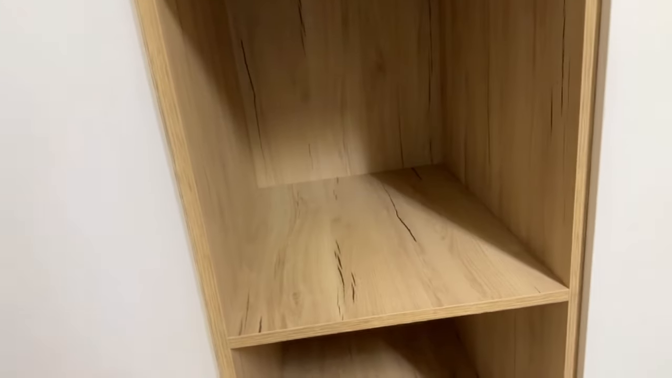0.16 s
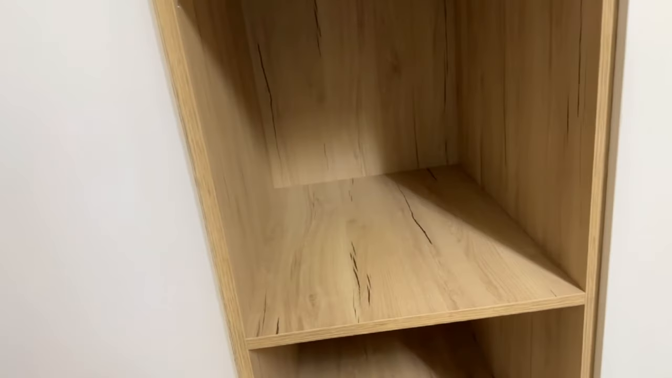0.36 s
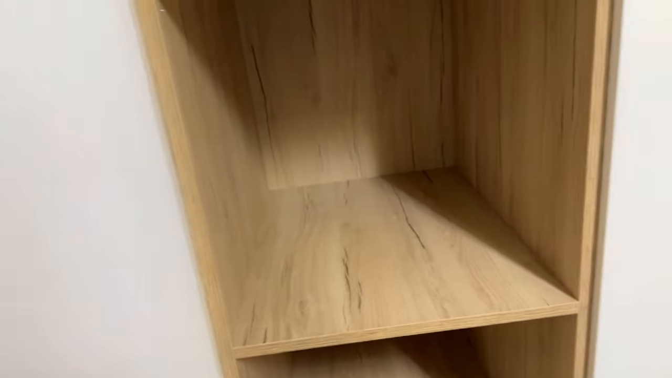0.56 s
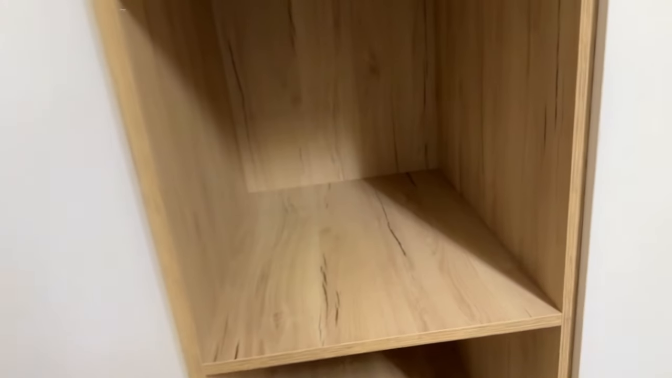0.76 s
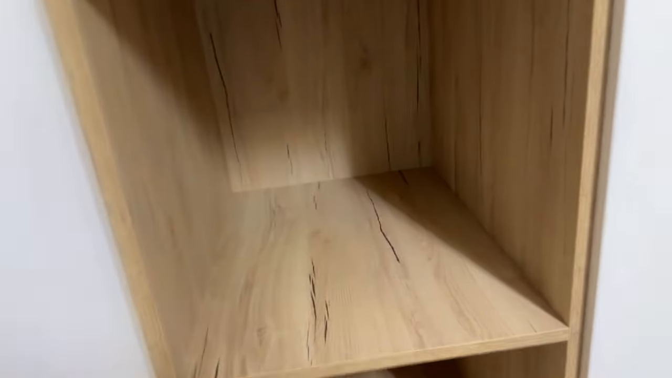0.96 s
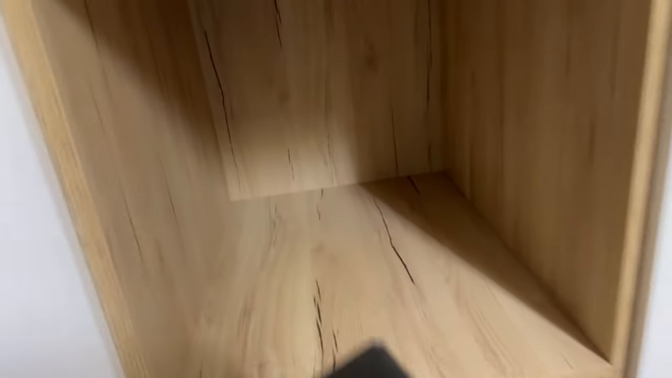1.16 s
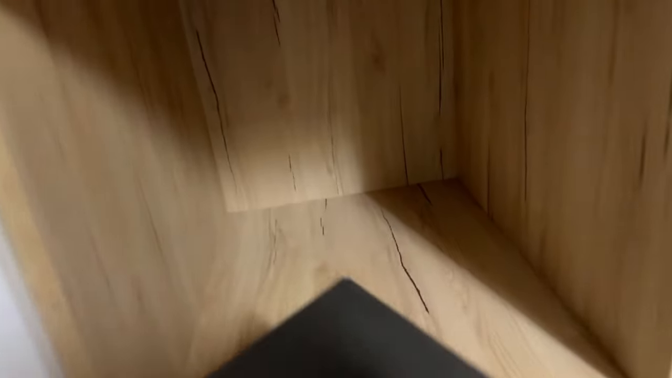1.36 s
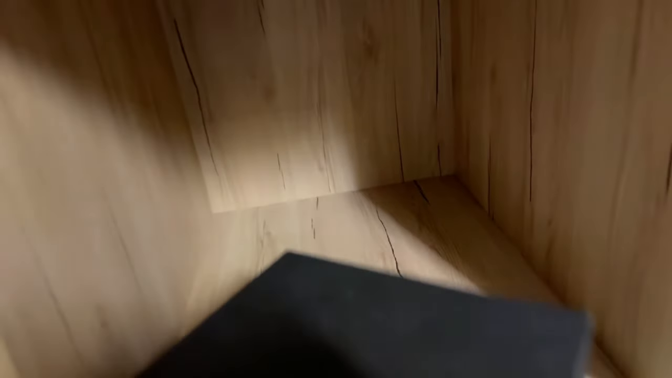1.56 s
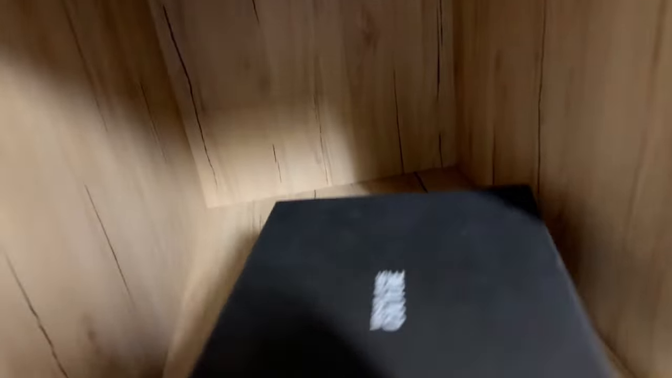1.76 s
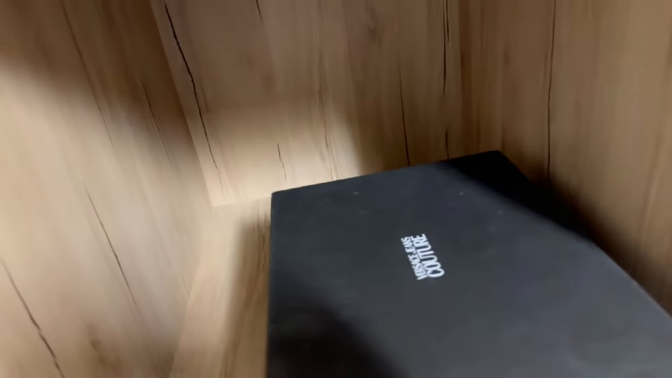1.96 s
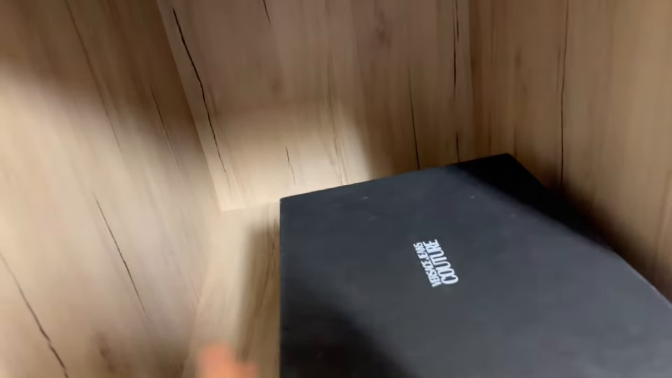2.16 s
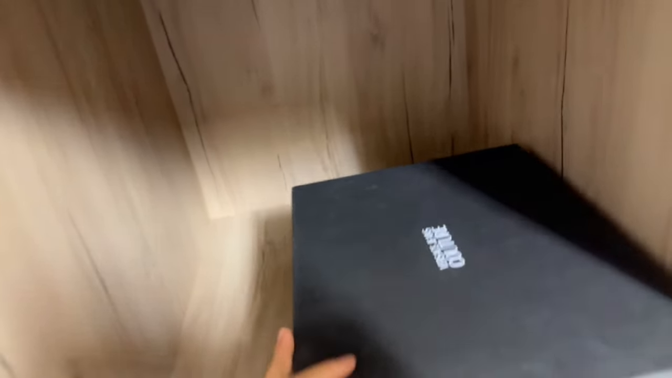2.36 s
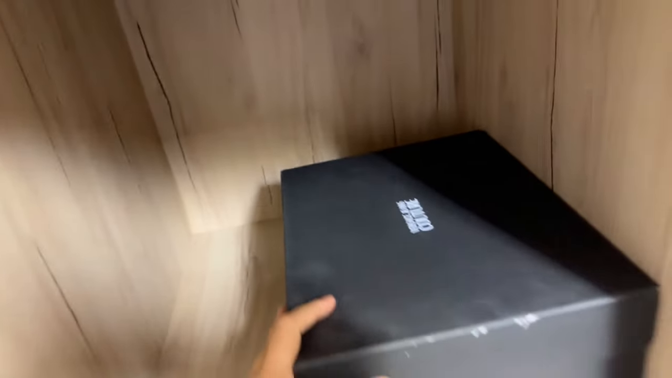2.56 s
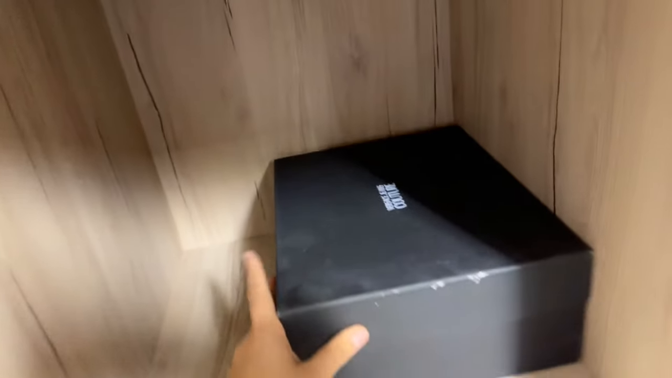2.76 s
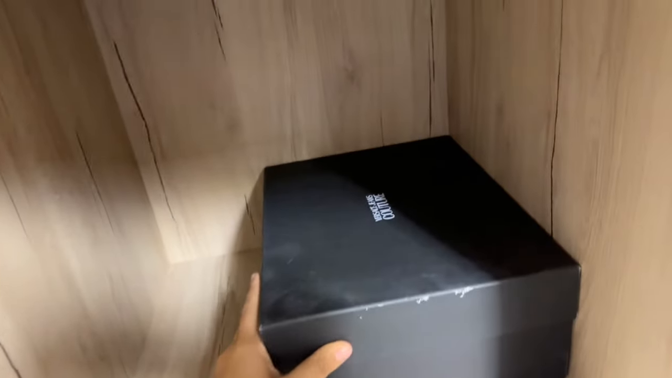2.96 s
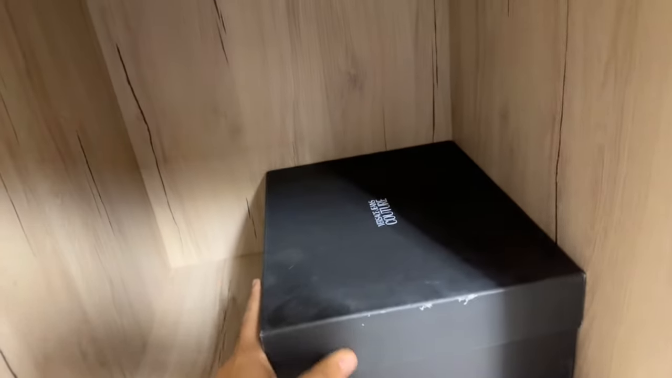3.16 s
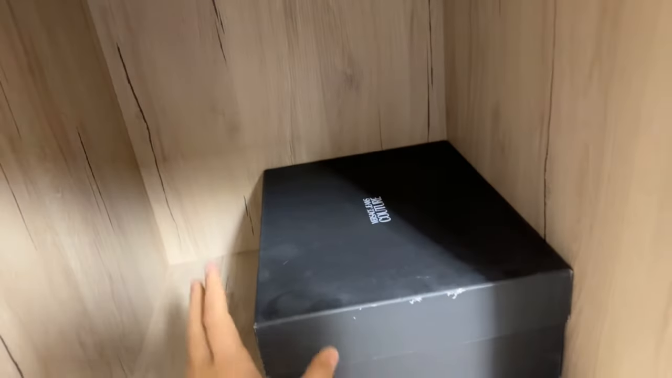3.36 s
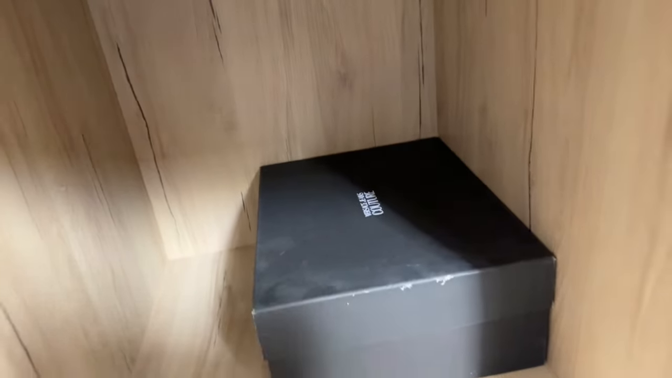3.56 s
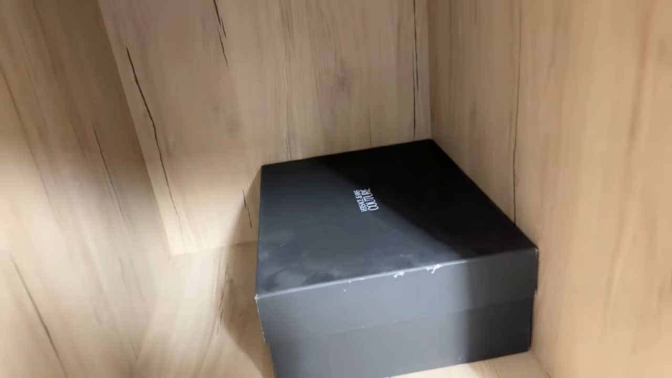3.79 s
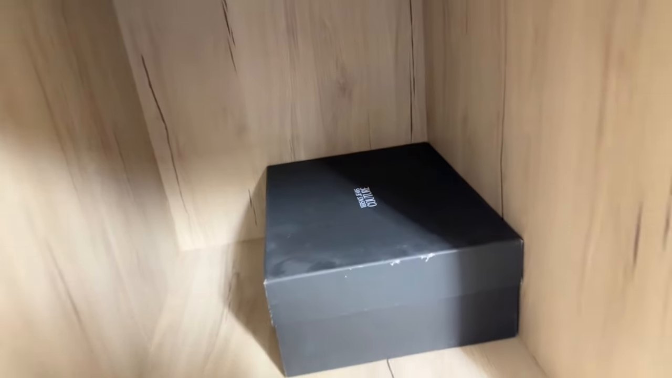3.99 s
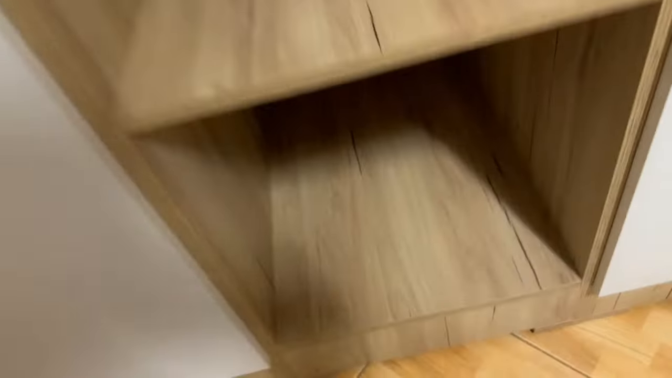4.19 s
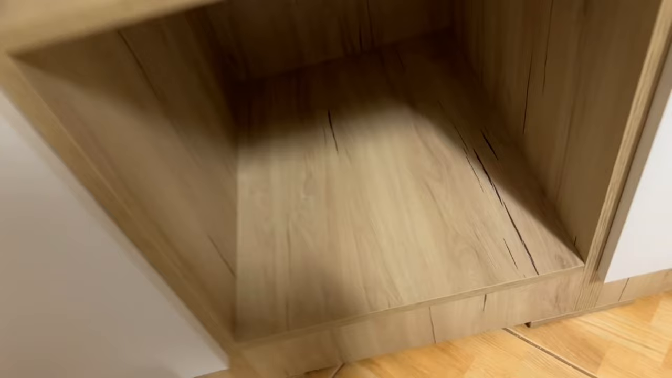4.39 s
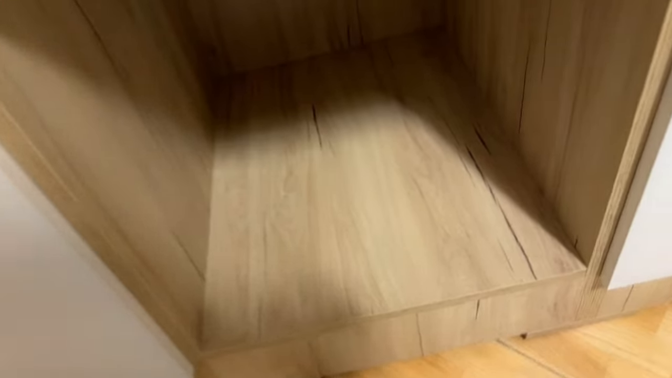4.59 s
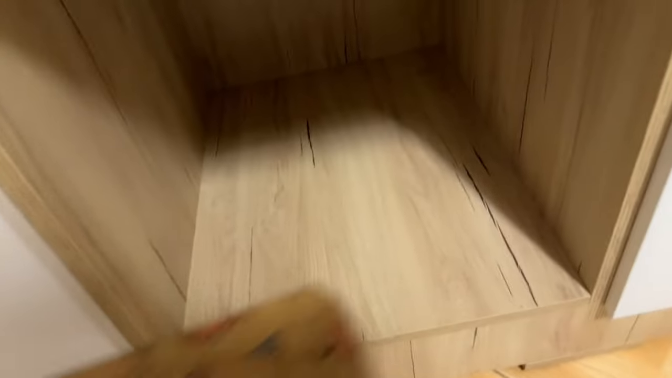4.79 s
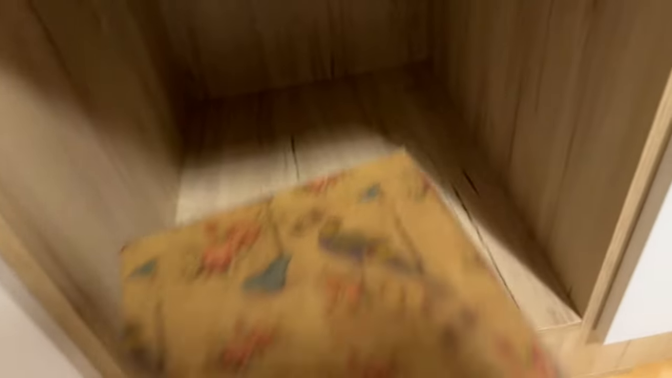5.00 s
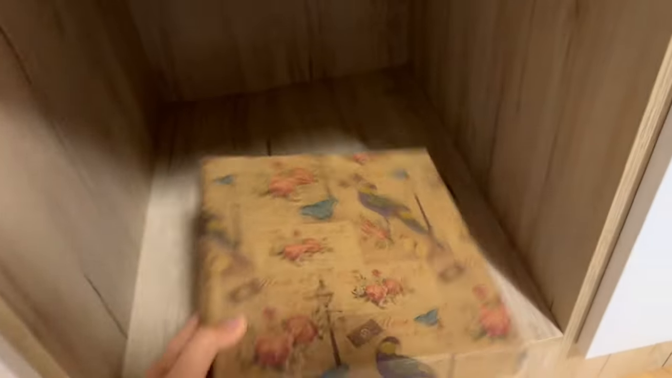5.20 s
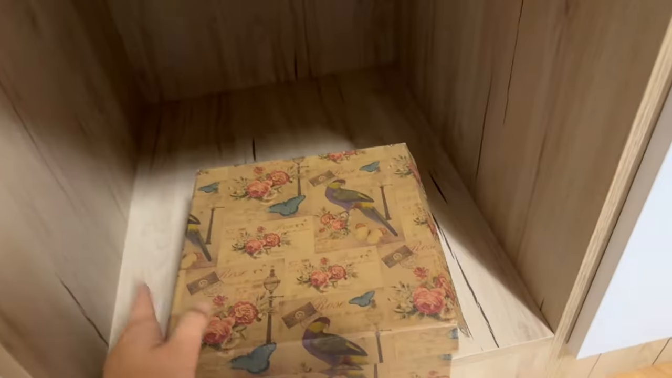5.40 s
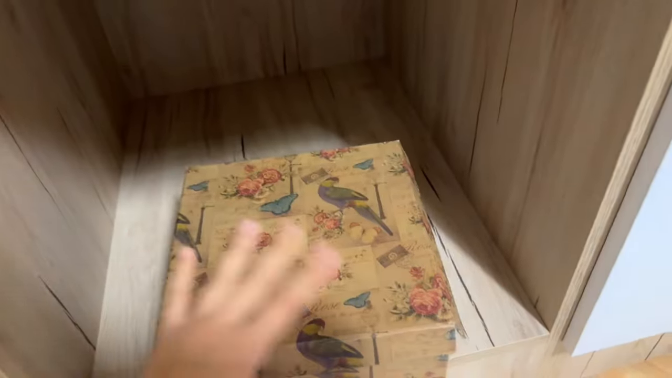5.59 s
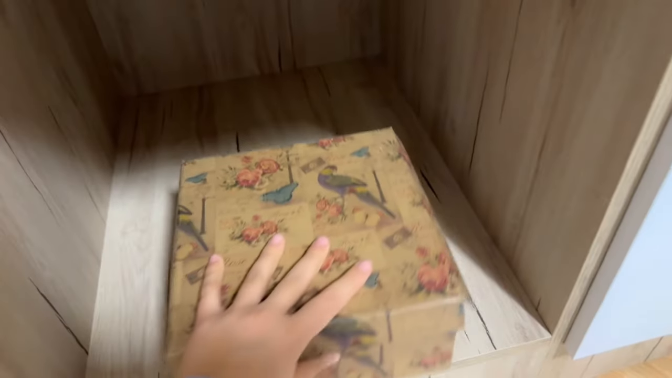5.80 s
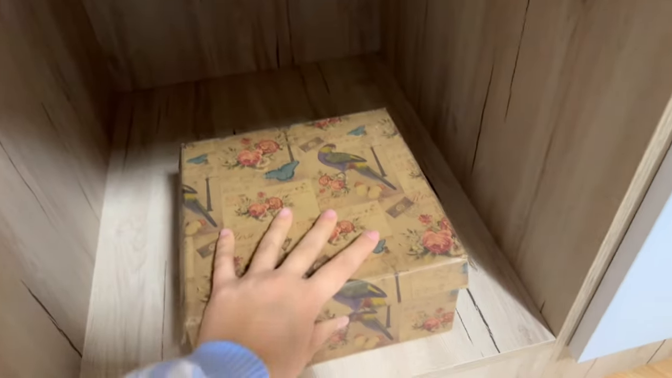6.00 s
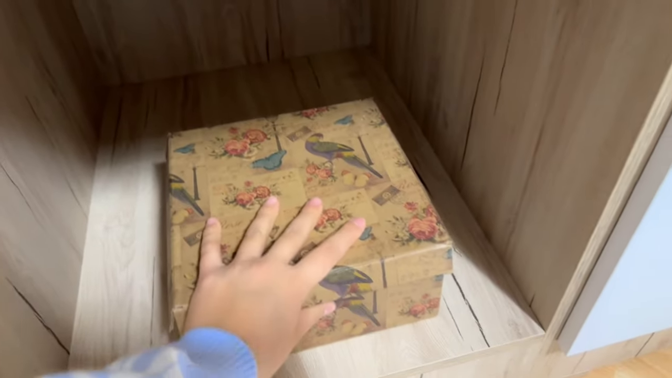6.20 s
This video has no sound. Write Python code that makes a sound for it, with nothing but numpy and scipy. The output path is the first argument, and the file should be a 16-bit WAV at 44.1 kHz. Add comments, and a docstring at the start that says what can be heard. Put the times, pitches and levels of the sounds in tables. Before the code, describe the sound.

A cardboard box thumps onto a wooden shelf and slides in, then a second lands and a hand faintly strokes its lid.

```python
"""Small dry ticks and handling rustle close to the microphone, over a low room rumble; then two cardboard
boxes, one after the other, bump into the cubbies of a chipboard shelf. Each bump rings the boards, the
deep boom swelling late. The first box squeaks, hisses and rubs as it is pushed in; a hand strokes the
lid of the second. Between the two, a finger taps and the sound drops out briefly."""
import sys
import numpy as np
from scipy import signal
from scipy.fft import rfft, irfft, next_fast_len
from scipy.io import wavfile
from scipy.ndimage import uniform_filter1d, minimum_filter1d

SR = 44100
rng = np.random.default_rng(int(sys.argv[2]) if len(sys.argv) > 2 else 0)


def dump_mix(stems):
    """Bounce the given channels to the path in sys.argv[1] as a 16-bit WAV at rate SR."""
    frames = np.atleast_2d(stems).T  # one column per channel
    limited = np.clip(frames, -1, 1)  # hard clip at full scale
    pcm = np.round(limited * 32767).astype(np.int16)
    wavfile.write(sys.argv[1], SR, pcm)


N = 275444
T = np.arange(N) / SR
BOOM_BELOW_HZ = 200

# Board and box modes, upper cubby. Each row: frequency in Hz, level in dB, T60 in seconds.
UPPER_CUBBY_MODES = [(104.6, 7.5, 0.41), (112.2, -7, 0.33), (156.7, -6, 0.37), (192, -13, 0.23),
                     (232, 0, 0.076), (295.2, 2.5, 0.068), (338.6, 1, 0.015), (420.5, 1, 0.03),
                     (522.4, -7.5, 0.12), (707, -8, 0.064), (790, -12.5, 0.044), (862, -11.5, 0.11),
                     (1035, -13, 0.044), (1256, -21, 0.03), (1815, -34, .04), (3145, -27, 0.044),
                     (3440, -28.5, .03)]
# Audible spans, one per box. Each row: start, fade-in, end, all in seconds.
AUDIBLE_SPANS = [(0.077, 0.0054, 4.1721), (4.33, 0.0091, 6.3)]


def undb(db):
    return 10 ** (np.asarray(db) / 20)


def unit(x):
    return x / np.sqrt(np.mean(x ** 2))


def peak(x):
    return x / np.abs(x).max()


def lowpass(x, hz):
    return signal.sosfilt(signal.butter(2, min(hz, .45 * SR), fs=SR, output="sos"), x)


def noise(spectrum, source=None):
    """White noise, or source, coloured by (Hz, dB) points; rms 1."""
    size = next_fast_len(N)
    hz, db = np.transpose(spectrum)
    bin_hz = np.maximum(np.arange(size // 2 + 1) * SR / size, 1)
    gain = undb(np.interp(np.log(bin_hz), np.log(hz), db, -120, -120))
    source = rng.standard_normal(N) if source is None else source
    return unit(irfft(rfft(source, size) * gain, size)[:N])


def mode(x, hz, t60_s):
    """Decaying resonance; a unit impulse rings at amplitude 1."""
    pole = np.exp(2j * np.pi * hz / SR - np.log(1000) / (max(t60_s, .003) * SR))
    return signal.lfilter([1], [1, -pole], x).imag


def band(x, hz, half_width_hz):
    """Lows of x shifted to a gliding centre; rms 1."""
    return unit(lowpass(x, half_width_hz) * np.sin(2 * np.pi * np.cumsum(hz) / SR))


def walk(rate_hz):
    """Slewed random steps, spread near 1."""
    hold = int(SR / rate_hz)
    return uniform_filter1d(np.repeat(rng.standard_normal(N // hold + 1), hold), hold)[:N]


def add(out, x, start_s):
    i = int(start_s * SR)
    out[i:i + len(x)] += x[:N - i]


def curve(tables, column):
    """Summed gain from a dB column of timed tables, silent outside them."""
    return sum(undb(np.interp(T, rows[:, 0], rows[:, column], -200, -200))
               for rows in map(np.array, tables))


def room_tone():
    """Drifting rumble, faint air, a wavering hum and microphone hiss."""
    # One table per span. Each row: time in seconds, rumble in dB, air in dB.
    levels = [
        [(.07, -49, -65), (.9, -45.5, -63.5), (1.7, -50.5, -64), (2.4, -53.5, -64), (4.22, -47.5, -64.5)],
        [(4.32, -41, -75), (5.0, -41.5, -70), (5.6, -41, -68.5), (6.4, -42, -65.5)],
    ]
    # Spectra, the rumble with one per span. Each row: frequency in Hz, density in dB.
    rumble_spectra = [
        [(8.8, -38), (15, -13), (43, -3), (59, 0.5), (79, -3.5), (97, -14), (107, -17), (178, -22.5),
         (220, -22.5), (290, -52.5), (480, -120)],
        [(8.8, -43.5), (15, -15), (40, -0.5), (60, 2), (73, -3.5), (97, -13.5), (121, -16.5), (168, -27.5),
         (220, -31.5), (290, -67.5), (480, -120)],
    ]
    air_spectrum = [(59, -25.5), (100, -12), (156, -13), (295, -11.5), (605, -25), (673, -24), (748, -27.5),
                    (1010, -28.5), (2450, -36.5), (6770, -54), (10100, -70.5), (12300, -59.5), (15800, -62)]
    mic_spectrum = [(1000, -9), (2500, -1.5), (5000, -8.5), (8000, -13), (10000, -19.5), (12300, -14.5),
                    (15800, -27.5)]
    rumble = sum(noise(spectrum) * curve([rows], column=1)
                 for spectrum, rows in zip(rumble_spectra, levels))
    rumble *= undb(2 * walk(5.9) + 3 * walk(3.9))
    air = noise(air_spectrum) * undb(.6 * walk(28)) * curve(levels, column=2)
    hum = unit(mode(rng.standard_normal(N), hz=264.9, t60_s=1)) * (T > 2.2) * (T < 4.1)
    return rumble + air + undb(-68.5) * uniform_filter1d(hum, size=9) + undb(-86) * noise(mic_spectrum)


def handling_rustle():
    """Patchy handling grains on the recorder, swelling into a finger tap just before the silence."""
    # One table per spell. Each row: time in seconds, level in dB.
    spells = [
        [(.08, -81), (.2, -78), (.3, -78.5), (.4, -85), (.52, -81), (.68, -104), (.8, -92), (.85, -74.5),
         (.93, -93), (1.01, -81), (1.07, -100), (1.095, -76), (1.125, -61), (1.145, -96), (1.25, -99),
         (1.3, -74), (1.33, -75), (1.36, -86), (1.39, -77), (1.42, -94.5), (1.52, -66)],
        [(4.14, -83), (4.156, -78.5), (4.164, -42.5), (4.173, -70)],
    ]
    # Each row: frequency in Hz, density in dB.
    spectrum = [(300, -23), (800, 6), (1400, 1), (2300, 1), (3600, -2), (4600, -16.5), (7500, -26),
                (12000, -32), (15800, -42.5)]
    grains = rng.standard_normal(N) * undb(3 * walk(250) + 3.2 * walk(48))
    return curve(spells, column=1) * noise(spectrum, grains)


def handling_ticks():
    """Dry ticks through a thin shell: treble arrives first, so the pitch falls at once."""
    # Each row: start in seconds, level in dB, initial pitch in Hz, T60 in seconds, relative grit in dB.
    ticks = [(0.311, -61, 3000, 0.033, -24), (0.497, -49.5, 2530, 0.028, -20),
             (0.604, -58.5, 2980, 0.021, -17), (0.773, -59, 1500, 0.012, -15),
             (0.9795, -64, 5000, 0.0084, -8), (0.983, -51, 2920, 0.0057, 0.5),
             (1.038, -50.5, 1400, 0.026, -15), (1.111, -44.5, 3500, 0.039, -23),
             (1.122, -56, 4940, 0.023, -12), (1.128, -49, 4000, 0.014, -24), (1.133, -28, 2850, 0.09, -23),
             (1.304, -62, 4000, 0.0065, -15), (1.313, -54, 3000, 0.015, -10),
             (1.319, -51, 2530, 0.0067, -17), (1.321, -39.5, 2410, 0.12, -26),
             (2.026, -56, 4530, 0.0033, -14), (2.1801, -60, 4330, .006, 10), (2.186, -57, 3000, .008, 0),
             (2.2155, -52, 5000, 0.006, -1), (2.25, -58, 4000, 0.0093, 3), (3.575, -57, 5000, 0.0033, -12),
             (3.655, -57.5, 5950, 0.01, -10), (3.949, -45.5, 1800, 0.011, -27.5),
             (4.164, -42, 2510, 0.026, 1.5), (4.1657, -28.5, 1510, 0.028, -14),
             (4.168, -25.5, 2046, 0.036, -10)]
    # Scattered close to the microphone; same columns.
    faint_ticks = [(np.interp(when, [0, 1], (.08, 1.5)), -59.5 - 2 * softness,
                    np.interp(pitch, [0, 1], (800, 2880)), .012, -10)
                   for when, softness, pitch in rng.random((14, 3))]
    out, t = np.zeros(N), np.arange(SR // 10) / SR
    for start_s, level_db, hz, t60_s, grit_db in ticks + faint_ticks:
        fall_s = .00098 * (.0036 / t60_s) ** .46  # longer ticks drop sooner
        chirp = np.sin(2 * np.pi * hz * fall_s * np.log(1 + t / fall_s)) * 1000 ** (-t / t60_s)
        grit = undb(grit_db) * lowpass(rng.standard_normal(len(t)), 2 * hz) * np.exp(-t / .0025)
        add(out, undb(level_db) * lowpass(lowpass(chirp + grit, hz), 2.3 * hz), start_s)
    return out


def board_knock(t, modes, top_hz, place, tilt_db_oct):
    """An edge lands in small jolts that ring the higher modes; lower ones build up later."""
    contact_s, build_cycles, place_spacing_hz = .0062, .48, 283.4
    jolts = lowpass(rng.standard_normal(len(t)) * np.exp(-t / contact_s), top_hz)
    out = np.zeros(len(t))
    for k, (hz, db, t60_s) in enumerate(modes):
        if hz > BOOM_BELOW_HZ:
            place_db = 4.5 * np.cos(2 * np.pi * (hz / place_spacing_hz - place))
            ring = peak(mode(jolts, hz, t60_s) * (1 - np.exp(-(t * hz / build_cycles) ** 2)))
            out += (-1) ** k * undb(db + tilt_db_oct * np.log2(hz / 400) + place_db) * ring
    return out


def board_boom(t, modes, lag_s, free_s, tilt_db_oct):
    """The boards take the load gradually, deepest mode last; the resting box then damps them."""
    damped_t60_s, undamped_db = .028, -15.5
    out = np.zeros(len(t))
    for hz, db, t60_s in modes:
        if hz < BOOM_BELOW_HZ:
            ring = np.sin(2 * np.pi * hz * t) * 1000 ** (-t / t60_s)
            swell = 1 - np.exp(-(t * hz / 100 / lag_s) ** 4)
            out += undb(db + tilt_db_oct * np.log2(hz / 104)) * ring * swell
    return out * (1000 ** (-np.maximum(t - free_s, 0) / damped_t60_s) + undb(undamped_db))


def wall_rattle(t, source, box):
    """Struck box walls give a papery rattle."""
    level_db, t60_s = ((-4.5, .086), (-10, .11))[box]
    return undb(level_db) * source * (1 - np.exp(-t / .0011)) * 1000 ** (-t / t60_s)


def card_crack(t, source, box, top_hz):
    """Card slaps the board: a crisp snap, then a short decay."""
    rise_s, t60_s, snap_db, snap_t60_s = ((.00091, .07, 2.5, .011), (.002, .12, -2.5, .0084))[box]
    decay = 1000 ** (-t / t60_s) + undb(snap_db) * 1000 ** (-t / snap_t60_s)
    burst = source * (1 - np.exp(-t / rise_s)) * decay
    return lowpass(lowpass(burst, top_hz), 1.7 * top_hz)


def bumps():
    """Box 0 hits the upper cubby, paper-covered box 1 the lower: knock, rattle, boom and crack."""
    # Each row: start in seconds; knock, boom and crack gain in dB; boom lag at 100 Hz and time before
    # damping in seconds; strike place 0-1; knock and boom tilt in dB/octave.
    hits = [(1.521, -31.5, -56, -59, 0.0088, 0.03, .9, -4.1, -2),
            (1.529, -13.5, -15, -41, 0.027, 0.076, 0.57, 1, 0),
            (1.637, -26, -31.5, -49, 0.015, 0.062, 0.11, -1.2, 7),
            (2.029, -68, -48, -72, 0.0042, 0.032, .3, 6, -4.5),
            (2.182, -46, -58, -73, .005, .02, .4, -1, 1),
            (2.199, -45, -40, -74.5, 0.0017, 0.016, 0.4, 1, 4),
            (2.217, -33, -31, -61.5, 0.016, 0.077, 0.5, -3, -5.5),
            (2.397, -28, -28, -39.5, 0.023, 0.055, 0.29, 3.2, -12),
            (2.445, -35, -29.5, -52, 0.0033, 0.011, 0.5, 0, -17.5),
            (2.7951, -15.5, -14.5, -26, 0.021, 0.034, 0.99, -1.5, 7),
            (3.040, -46.5, -51.5, -59.5, 0.01, 0.032, 0.98, -5.5, -2),
            (3.159, -42, -35.5, -67.5, 0.016, 0.04, 0.32, .1, -5.8),
            (3.955, -56, -37.5, -93, 0.0032, 0.0055, .9, -9, 4),
            (5.1849, -27, -37, -49.5, 0.008, 0.1, 0.28, -1, -10),
            (5.198, -22, -37, -59, 0.019, 0.041, 0.12, -4.5, -7),
            (5.2672, -41, -57.5, -52, .01, 0.045, 0.2, 2, -1.5),
            (5.273, -16.5, -28.5, -48.5, 0.009, 0.068, 0.04, 1.3, 6.5),
            (5.537, -69, -41.5, -81, 0.0057, 0.023, .3, -2, -21),
            (5.613, -46, -49, -74, 0.01, 0.035, 0.37, -11, 5),
            (5.631, -39, -45, -65, 0.011, 0.043, 0.68, -13, -3),
            (5.641, -52, -33, -72.5, 0.006, 0.014, 0.8, -10, 2),
            (5.663, -51, -39, -77, 0.0041, 0.024, 0.2, -8, -24.5)]
    # Each row: frequency in Hz, level in dB, T60 in seconds.
    lower_cubby_modes = [(68.7, 2.5, 0.36), (104.2, 13.5, 0.14), (190, -2, 0.11), (239, 0, 0.059),
                         (323, 3, 0.054), (426, 0, 0.055), (469, -9.5, 0.087), (583, -1, 0.031),
                         (656, -8.5, 0.037), (790, -20.5, 0.061), (960, -25.5, 0.011), (1000, -17, 0.022),
                         (1175, -16.5, 0.027), (1350, -14.5, 0.02), (1632, -19, 0.011)]
    # Spectra. Each row: frequency in Hz, density in dB.
    card_spectrum = [(400, -17.5), (700, -5.5), (1300, -21), (2000, -14.5), (3200, -10), (4600, -25),
                     (7000, -30.5), (8500, -45), (9700, -43), (11000, -52.5), (15500, -51.5)]
    paper_spectrum = [(600, -25), (1000, -3.5), (1250, 0.5), (1950, -9), (2500, 0.5), (3500, -7.5),
                      (5000, -15.5), (7500, -32), (8600, -39), (9700, -37), (11000, -54), (15500, -65)]
    wall_spectrum = [(88, -27), (150, -5.5), (231, -20.5), (434, -10.5), (494, -19), (1010, -30.5),
                     (1230, -41.5), (2000, -40.5), (2600, -78), (4400, -120)]
    crack_noises, wall_noise = (noise(card_spectrum), noise(paper_spectrum)), noise(wall_spectrum)
    out, t = np.zeros(N), np.arange(SR // 2) / SR
    for start_s, knock_db, boom_db, crack_db, lag_s, free_s, place, knock_db_oct, boom_db_oct in hits:
        box = int(start_s > AUDIBLE_SPANS[1][0])
        modes = (UPPER_CUBBY_MODES, lower_cubby_modes)[box]
        base_hz, oct_per_db = ((5960, 1), (12000, .14))[box]
        top_hz = base_hz * 2 ** (oct_per_db * (crack_db + 48))  # harder cracks reach higher
        i = int(start_s * SR)
        knock = board_knock(t, modes, top_hz, place, knock_db_oct) * undb((-6, -7)[box])
        rattle = wall_rattle(t, wall_noise[i:i + len(t)], box)
        boom = board_boom(t, modes, max(lag_s, .002), free_s, boom_db_oct)
        crack = card_crack(t, crack_noises[box][i:i + len(t)], box, top_hz)
        bump = undb(knock_db) * (knock + rattle) + undb(boom_db) * boom + undb(crack_db) * crack
        add(out, bump * np.cos(np.pi * t), start_s)
    return out


def box_slides(grains, rub):
    """Card fibres drag over laminate: hiss, narrow singing bands, rub and a fizzing edge."""
    # One table per push. Each row: time in seconds, hiss in dB, rub in dB.
    pushes = [
        [(1.53, -60, -54), (1.565, -60.5, -56), (1.6, -52, -57.5), (1.634, -57.5, -45), (1.648, -51, -37.5),
         (1.67, -52, -41), (1.704, -57.5, -42), (1.8, -59.5, -48), (1.88, -63.5, -49), (1.96, -66.5, -56.5),
         (2.0, -76.5, -61.5), (2.06, -92.5, -82)],
        [(2.17, -81.5, -71), (2.19, -74, -66), (2.21, -77, -60), (2.235, -70, -52), (2.26, -62, -52),
         (2.31, -58, -50), (2.372, -57.5, -50), (2.42, -52, -45.5), (2.5, -50.5, -48), (2.55, -51.5, -53),
         (2.6, -51, -52.5), (2.68, -52.5, -51.5), (2.74, -49.5, -46.5), (2.785, -49.5, -46), (2.83, -66.5, -57)],
        [(3.14, -79, -63), (3.17, -70.5, -65), (3.28, -88, -82)],
    ]
    # Each row: base frequency in Hz, level relative to the hiss in dB.
    singing_bands = [(2600, -18), (3150, -16), (3650, -14)]
    # Each row: time in seconds, pitch factor.
    band_glide = [(1.5, 1.01), (2.0, 0.86), (2.2, 0.98), (2.5, 1.03), (2.8, 1.05)]
    # Each row: peak time in seconds, level in dB, rise and fall in dB/s.
    edge_fizzes = [(1.61, -75.5, 204, 123), (3.178, -90, 501, 192)]
    # Spectra. Each row: frequency in Hz, density in dB.
    hiss_spectrum = [(530, -24.5), (900, -5), (1200, -5.5), (1760, -6.5), (2200, -3.5), (2650, -1),
                     (3300, -4), (3850, -1.5), (4200, -4.5), (4700, -9.5), (5600, -12), (7000, -16),
                     (10300, -32.5), (12100, -26), (15800, -24)]
    fizz_spectrum = [(9000, -29.5), (11500, -14.5), (14000, -2.5), (15800, -3)]
    glide = np.interp(T, *np.transpose(band_glide))
    hiss = noise(hiss_spectrum, grains)
    for base_hz, db in singing_bands:
        gain = undb(db + 3.5 * walk(12))
        hiss += gain * band(grains, base_hz * glide * (1 + .05 * walk(6)), half_width_hz=180)
    fizz_gain = sum(undb(db - np.maximum(rise_db_s * (peak_s - T), fall_db_s * (T - peak_s)))
                    for peak_s, db, rise_db_s, fall_db_s in edge_fizzes)
    fizz = fizz_gain * noise(fizz_spectrum, grains)
    return curve(pushes, column=1) * hiss + curve(pushes, column=2) * rub + fizz


def squeaks():
    """The first box tips flat; its edge squeaks on the laminate in brief rough tones."""
    # Each row: start in seconds, level in dB, pitch in Hz, length in seconds.
    slips = [(1.58, -52.5, 3830, 0.015), (1.594, -44.5, 2670, 0.019), (1.593, -49, 4400, 0.0058)]
    out = np.zeros(N)
    for start_s, db, hz, length_s in slips:
        size = int(length_s * SR)
        tone = unit(mode(rng.standard_normal(size), hz, t60_s=.045))
        add(out, undb(db) * tone * np.hanning(size), start_s)
    return out


def lid_stroke(grains, rub):
    """A hand strokes the paper-covered lid; the swish sinks in pitch as it slows."""
    # Each row: time in seconds, hiss in dB, rub in dB, swish centre in Hz.
    stroke = [(5.63, -65, -67, 2704), (5.684, -79.5, -87, 3010), (5.745, -72, -67, 3250),
              (5.84, -74.5, -73, 3180), (5.97, -78, -74.5, 2604), (6.05, -93.5, -99.5, 2500),
              (6.2, -77, -74.5, 2630), (6.23, -82, -73, 2630)]
    # Each row: frequency in Hz, density in dB.
    lid_spectrum = [(710, -39), (1200, -10), (2110, -2.5), (2580, 0.5), (3250, -5), (3650, -3), (3910, -3),
                    (6160, -13.5), (9000, -25.5), (11700, -47), (19800, -120)]
    time_s, _, _, swish_hz = np.transpose(stroke)
    swish = band(grains, np.interp(T, time_s, swish_hz), half_width_hz=280)
    hiss = noise(lid_spectrum, grains) + undb(-4) * swish
    return curve([stroke], column=1) * hiss + curve([stroke], column=2) * rub


def friction():
    """Uneven grains wake the board modes over a dull rub; both feed the slides and the stroke."""
    # Each row: frequency in Hz, density in dB.
    rub_spectrum = [(71, -36), (120, 4), (183, -8), (290, -13.5), (342, -12.5), (408, -3.5), (529, -12),
                    (762, -11.5), (1070, -15), (1210, -22.5), (2000, -24), (2600, -49.5), (4400, -120)]
    grains = rng.standard_normal(N) * undb(.47 * walk(300) + walk(30))
    ring = sum(undb(db + 3.5 * walk(5.5)) * mode(grains, hz, t60_s=.12)
               for hz, db, _ in UPPER_CUBBY_MODES if hz > BOOM_BELOW_HZ)
    rub = (noise(rub_spectrum) + undb(-6) * unit(ring)) * undb(2 * walk(25.09))
    return box_slides(grains, rub) + lid_stroke(grains, rub)


def room(x):
    """Adds a small room's diffuse tail: thin in the bass, treble dying sooner."""
    low_t60_s, treble_t60_s, delay_s, bass_cut_hz, tail_db = .31, .25, .004, 135, -14
    t = np.arange(SR // 2) / SR
    white = rng.standard_normal(len(t))
    low = lowpass(white, hz=2000)
    tail = low * 1000 ** (-t / low_t60_s) + (white - low) * 1000 ** (-t / treble_t60_s)
    tail = signal.lfilter([1], [1, -.5], tail * (t > delay_s))
    tail = signal.sosfilt(signal.butter(2, bass_cut_hz, "high", fs=SR, output="sos"), tail)
    return x + undb(tail_db) * signal.fftconvolve(x, tail / np.sqrt(np.sum(tail ** 2)))[:N]


def scene():
    """Boxes with room tail, dry handling, room tone; mono."""
    boxes = room(bumps() + friction() + squeaks())
    return (boxes + handling_ticks() + handling_rustle() + room_tone())[None]


def record(dry):
    """Peak limiter, silence outside the audible spans, steep treble cut."""
    limit_db, hold_s, top_hz = -10.6, .0026, 15900
    hold = int(hold_s * SR)
    gain = np.minimum(1, undb(limit_db) / (np.abs(dry) + 1e-9))
    gain = uniform_filter1d(minimum_filter1d(gain, hold, axis=1), hold // 2, axis=1)
    gate = sum(np.clip((T - start_s) / fade_s, 0, 1) * (T < end_s)
               for start_s, fade_s, end_s in AUDIBLE_SPANS)
    return signal.sosfilt(signal.ellip(8, .2, 70, top_hz, fs=SR, output="sos"), dry * gain * gate)


dry = scene()
out = record(dry)
dump_mix(out)
```